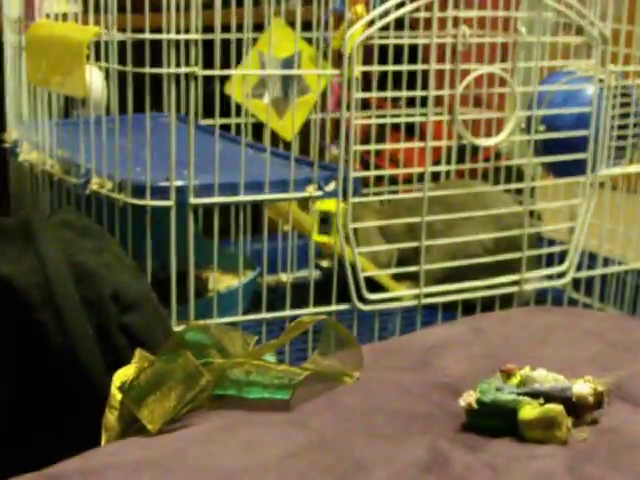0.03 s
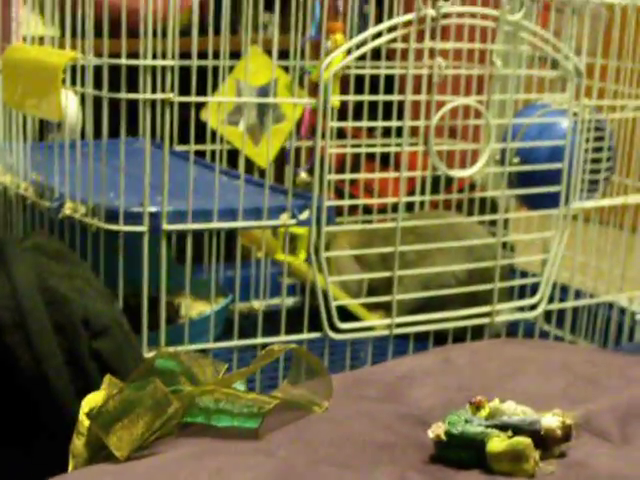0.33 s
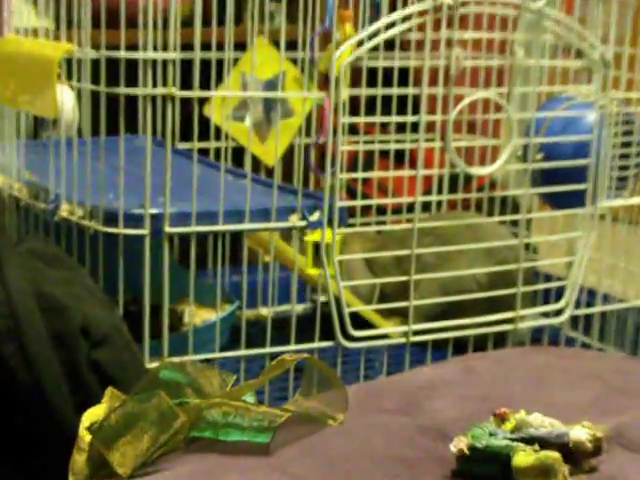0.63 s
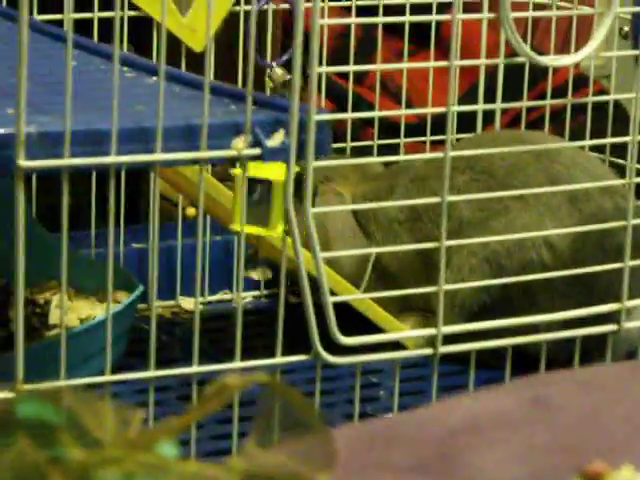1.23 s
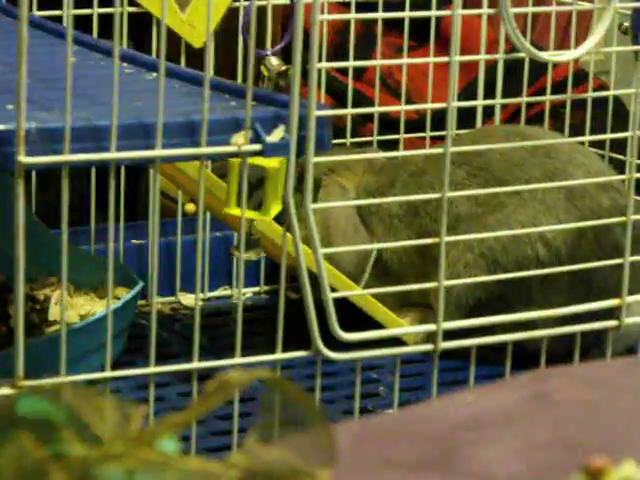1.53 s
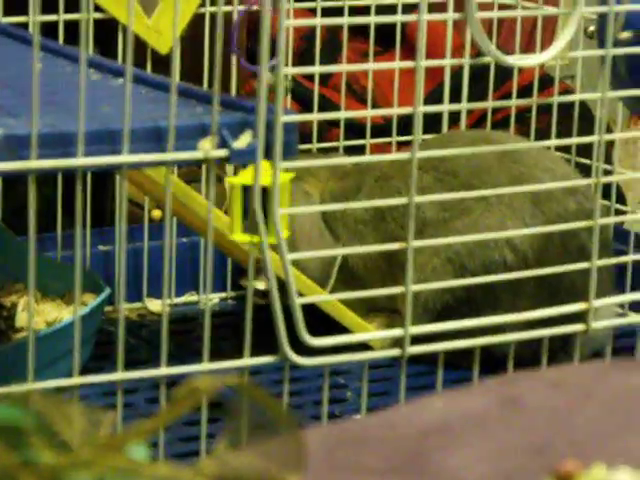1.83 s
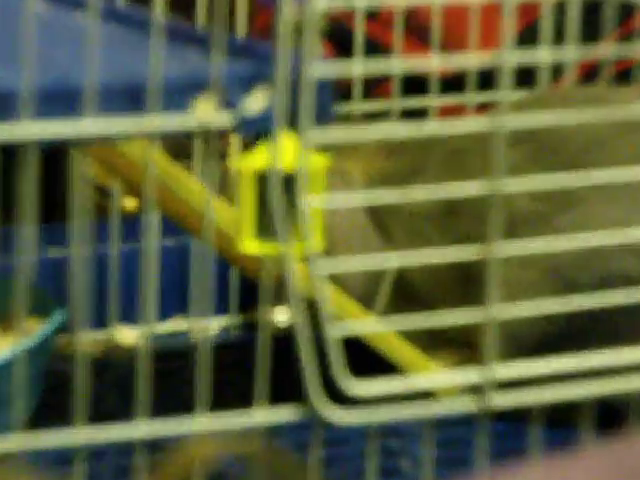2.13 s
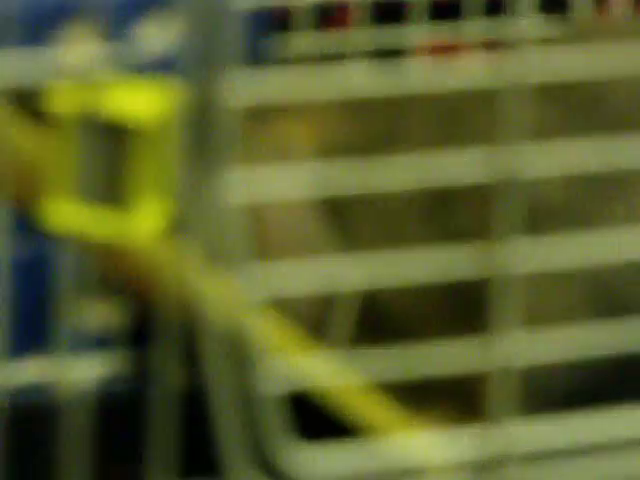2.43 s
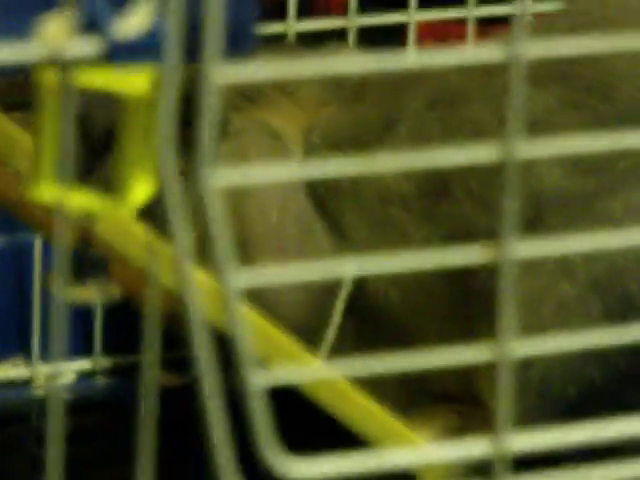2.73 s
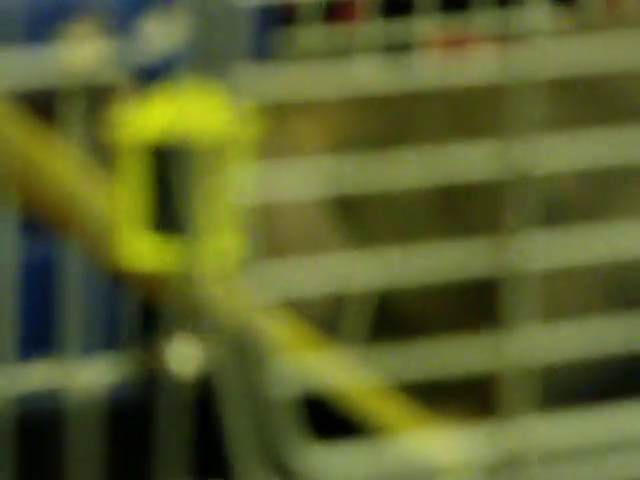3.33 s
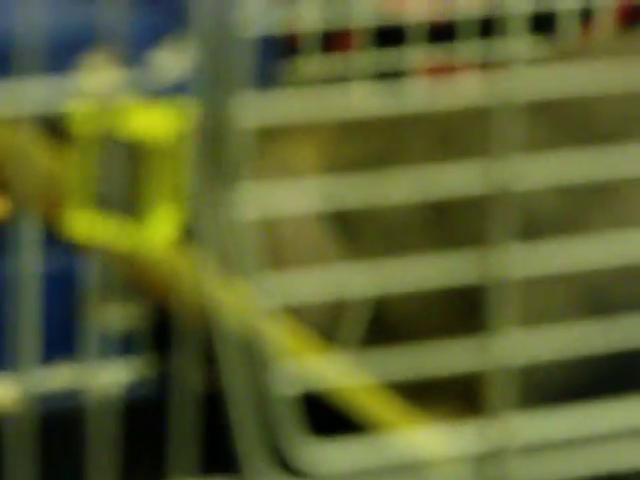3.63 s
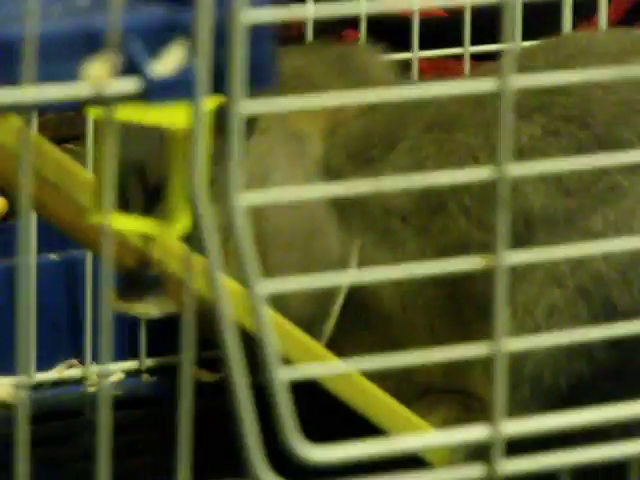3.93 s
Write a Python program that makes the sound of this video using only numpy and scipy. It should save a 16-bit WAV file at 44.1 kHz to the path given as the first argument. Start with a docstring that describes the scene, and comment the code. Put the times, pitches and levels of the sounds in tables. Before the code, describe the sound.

A small zoom motor whirs in three bursts inside a handheld camera, picked up by its own microphone indoors. Plastic clicks lead into each burst, and short buzzing focus rasps come between them and at the end, over constant hiss.

```python
"""A handheld camera zooms and refocuses in a quiet room, heard through its own body.
A steady hiss is there from the start, and the focus motor twitches. The zoom control clicks; the zoom
motor ticks step by step, spins up to a whine, then ticks to a halt. After more twitches comes a longer
zoom, near 2 s. The focus motor rasps in short runs, then the loudest click leads into a brief zoom.
A few more ticks and clicks follow, and one last rasp of the focus motor ends the scene."""
import sys
import numpy as np
from scipy import signal
from scipy.fft import rfft, irfft
from scipy.io import wavfile
from scipy.ndimage import uniform_filter1d

SR = 44100
rng = np.random.default_rng(int(sys.argv[2]) if len(sys.argv) > 2 else 0)


def persist_wave(psi):
    """Save psi, clipped to +-1, as 16-bit WAV."""
    counts = np.round(np.clip(psi, -1, 1) * 32767).astype(np.int16)
    wavfile.write(sys.argv[1], SR, np.atleast_2d(counts).T)


N = 176400
T = np.arange(N) / SR


def undb(db):
    """Turn decibels into a number to multiply a sound by."""
    return 10 ** (np.asarray(db) / 20)


def unit(x):
    """Scale a signal to an average power of 1."""
    return x / np.sqrt(np.mean(x ** 2))


def noise():
    """White noise: all frequencies equally strong."""
    return rng.standard_normal(N)


def wander(per_second):
    """A smooth random drift, about 1 in size."""
    hold = int(SR / per_second)
    stairs = np.repeat(rng.standard_normal(N // hold + 1), hold)
    return unit(uniform_filter1d(stairs, hold)[:N])


def gate(start, end, rise, fall):
    """Fade in from the start, hold, then die away after the end (all in seconds)."""
    return np.clip((T - start) / rise, 0, 1) * np.exp(-np.maximum(T - end, 0) / fall)


def gain_at(curve, hz):
    """Read the gain at a frequency off a curve of (frequency [Hz], level [dB]) points."""
    at, db = np.array(curve, float).T
    return undb(np.interp(np.log(hz), np.log(at), db))


def colour(x, curve, size=2048):
    """Give a sound the lows and highs of a curve; white noise keeps its power."""
    cepstrum = irfft(np.log(gain_at(curve, np.fft.rfftfreq(size, 1 / SR) + 1)))
    # make the filter ring after each tap, never before it
    cepstrum[1:size // 2] *= 2
    cepstrum[size // 2 + 1:] = 0
    ring = irfft(np.exp(rfft(cepstrum)))
    return signal.fftconvolve(x, ring / np.linalg.norm(ring))[:N]


def overtones(hz, table, flutter_db, flutter_rate, body=None):
    """Tones at multiples of a pitch; each flutters, and swells where the body (if given) rings."""
    phase, out = 2 * np.pi * np.cumsum(hz) / SR, 0
    for multiple, db in table:
        gain = undb(db + flutter_db * wander(flutter_rate))
        boost = gain_at(body, multiple * hz) if body else 1
        out = out + gain * boost * np.sin(multiple * phase + rng.uniform(0, 2 * np.pi))
    return unit(out)


# the lows and highs of the hiss (frequency [Hz], relative level [dB])
HISS_COLOUR = [(30, -7.5), (65, -5.5), (115, -10), (170, -9), (450, -6.5), (640, -9), (735, -5.5),
               (860, -9.5), (1900, -10.5), (3000, -14), (4800, -15), (5600, -21.5), (6100, -49.5)]


def hiss(level_db=-48.5):
    """The room and the microphone hiss, barely wavering."""
    return undb(level_db + 0.2 * wander(30)) * colour(noise(), HISS_COLOUR)


# each move of the focus motor (start [s], length [s], level [dB], knock boost [dB], treble boost [dB])
FOCUS_MOVES = [(0.033, 0.0079, -37.5, 5, 2), (0.0596, 0.0086, -39, 1, -4), (0.315, 0.0029, -34, -1.5, -6),
               (1.059, 0.011, -34, 1.5, -5), (1.0835, 0.0088, -38.5, 4, -6), (1.597, 0.021, -44.5, 0, -3.5),
               (1.645, 0.0053, -32.5, 4, -2.5), (1.678, 0.035, -44, 3, -2.5), (2.637, 0.036, -30.5, 2, -2),
               (2.673, .11, -29, -13, 0.5), (2.798, 0.012, -33, -9, 7), (2.887, 0.0032, -36, 11, 11),
               (2.893, 0.036, -49, -21, 13), (2.946, 0.042, -30, 3.5, 0), (2.974, 0.086, -28.5, 9, -1),
               (3.061, 0.044, -29, 1, -3.5), (3.852, 0.0036, -31, -13, 0.5),
               (3.864, 0.12, -30.5, -14, -1.5), (3.986, .02, -41.5, 8, -7)]
# the tones in its buzz (multiple of the step rate, relative level [dB])
FOCUS_BUZZ = [(1, -8.5), (2, -7), (3, -1), (4, -9), (7, 2.5), (8, -10), (10, -9)]
# its rasp (frequency [Hz], relative level [dB])
FOCUS_RASP = [(100, -44), (240, -37), (330, -12), (440, -3), (750, -3), (1000, 2), (1250, 2), (1500, -0.5),
              (1930, -2.5), (2130, 4.5), (2280, 0), (3150, -6), (3800, -11.5), (4300, -27), (4850, -10.5),
              (5600, -35.5)]
# the dull knock of the sliding part (frequency [Hz], relative level [dB])
SLIDE_KNOCK = [(150, -28.5), (330, -9.5), (500, 0), (720, -2), (1000, -11), (1700, -6), (2500, -14.5),
               (4000, -40.5)]


def focus_motor(step_hz=309, steps_per_turn=10, rise_s=0.0046, treble_hz=1780):
    """The slide knocks, then the motor buzzes and rasps, throbbing with each turn of its screw."""
    turn_s = steps_per_turn / step_hz
    bind_s = 0.013  # the screw sticks most this long into a move, then once a turn
    low_level, high_level, knocks = 0, 0, 0
    for start, length, db, knock_db, treble_db in FOCUS_MOVES:
        throb_db = 1.8 * np.cos(2 * np.pi * (T - start - bind_s) / turn_s)
        level = undb(db + throb_db) * gate(start, start + length, rise_s, fall=0.0038)
        low_level = np.maximum(low_level, level)
        high_level = np.maximum(high_level, level * undb(treble_db))
        knocks = knocks + undb(knock_db - 38.5) * gate(start, start + rise_s, rise_s, fall=0.006)
    hz = step_hz * (1 + 0.0015 * wander(110))
    step_pulses = np.exp(-(np.cumsum(hz) / SR % 1) / 0.77)
    screw_scrape = np.resize(noise()[:int(turn_s * SR)], N)  # the same on every turn
    rasp = colour(unit(step_pulses * (noise() + undb(-2) * screw_scrape)), FOCUS_RASP)
    buzz = overtones(hz, FOCUS_BUZZ, flutter_db=2, flutter_rate=53)
    running = undb(0.7 * wander(130)) * unit(rasp + undb(-6) * buzz)
    lows = signal.sosfiltfilt(signal.butter(4, treble_hz, fs=SR, output="sos"), running)
    return low_level * lows + high_level * (running - lows) + knocks * colour(noise(), SLIDE_KNOCK)


# each click of the zoom control or a lens part (time [s], level [dB], brightness [dB per octave],
# case pitch [ratio], ring length [ratio], relative thump level [dB])
CLICKS = [(0.3363, -23, 18, 0.86, 1.2, -23), (0.5462, -7, -0.5, 0.99, 0.93, -38),
          (0.5609, -29, -4, 0.5, 2.3, 5.5), (0.5673, -19.5, -3.5, 1.22, 0.56, -31),
          (1.0314, -20, 2, 0.86, 0.81, -37), (1.069, -22, -8, 1.1, 1, -28),
          (1.0896, -28, -2.5, 1.0, 1, -31), (1.8496, -6.5, 1, 0.988, 0.88, -32),
          (1.856, -25, 6, 0.88, 0.56, -7.5), (2.6434, -28, 2, 0.8, 0.78, -44),
          (2.8084, -22, -7, 1.3, 1.5, -32), (2.8954, -13.5, 6.5, 0.89, 0.73, -34),
          (2.9397, -14.5, 6, 1.14, 0.64, -40), (2.9819, -17, 2, 0.8, 0.83, -40),
          (3.0109, -16, 0.5, 0.91, 0.61, -42), (3.1593, -19, 9, 0.95, 0.73, -42),
          (3.1702, -0.3, 4, 0.87, 1.15, -19), (3.7155, -25, 15, 0.95, 1.04, -3),
          (3.758, -23.5, 8, 0.92, 0.88, -18), (3.7833, -6.5, -0.5, 0.97, 1.35, -38)]
# the notes of the plastic case, which shift with where it is hit
# (frequency [Hz], relative level [dB], time to fade by 60 dB [s])
CASE_NOTES = [(535, -16, 0.03), (812, -13, 0.02), (1352, 0.5, 0.02), (1647, 3.5, 0.016)]
# the notes of the small snapping latch (frequency [Hz], relative level [dB], time to fade by 60 dB [s])
LATCH_NOTES = [(2152, -3.5, 0.018), (2493, 4, 0.01), (3040, -8.5, 0.019), (4960, -4, 0.011)]


def clicks(contact_s=0.00028, rattle_s=0.005, thump_s=0.007, size=4096):
    """Each click briefly rings the case and the latch, with a faint rattle and a dull thump."""
    out, t = np.zeros(N + size), T[:size]
    contact = np.sin(np.pi / 2 * np.minimum(t / contact_s, 1)) ** 2
    # the small case gives off little sound outside 553-3475 Hz
    cut_lows = signal.butter(2, 553, "high", fs=SR, output="sos")
    cut_highs = signal.butter(4, 3475, fs=SR, output="sos")
    muffle = signal.butter(2, 300, fs=SR, output="sos")
    for time, db, bright, pitch, length, thump_db in CLICKS:
        case_notes = [(hz * pitch, note_db, fade_s) for hz, note_db, fade_s in CASE_NOTES]
        ring = 0
        for hz, note_db, fade_s in case_notes + LATCH_NOTES:
            gain = undb(note_db + bright * np.log2(hz / 1500))
            fade = np.exp(-np.log(1000) * t / (fade_s * length))
            ring = ring + gain * fade * np.sin(2 * np.pi * hz * t)
        ring = signal.sosfilt(cut_highs, signal.sosfilt(cut_lows, contact * ring))
        rattle = undb(-40) * np.exp(-t / rattle_s) * rng.standard_normal(size)
        low_noise = unit(signal.sosfilt(muffle, rng.standard_normal(size)))
        thump = undb(thump_db) * np.exp(-t / thump_s) * low_noise / 2
        i = int(time * SR)
        out[i:i + size] += undb(db) * (ring / np.abs(ring).max() + rattle + thump)
    return out[:N]


# each stretch of ticking by the zoom motor
# (start [s], end [s], first speed [steps/s], last speed [steps/s], level [dB], ring pitch [ratio])
TICK_RUNS = [(.545, 0.678, 195, 310, -37, 1.007), (0.948, 1.021, 390, 236, -38.5, 0.99),
             (1.858, 1.98, 213, 304, -38, 0.99), (2.435, 2.555, 320, 322, -34, 1.015),
             (2.563, 2.602, 224, 233, -36, 1.014), (3.225, 3.293, 211, 244, -40.5, 1.01),
             (3.346, 3.45, 317, 308, -39, 1.04), (3.449, 3.492, 264, 280, -41, 1.04),
             (3.708, 3.826, 165, 210, -41.5, 1.005)]
# how the lens barrel, the tube around the lens, rings (frequency [Hz], relative level [dB])
BARREL_RING = [(60, -12), (150, -10), (400, -14), (900, -17), (1550, -6), (2000, -12.5), (2600, -4),
               (2950, -3), (3180, 3.5), (3650, -14), (4200, -10.5), (4550, -19.5), (4920, -6.5),
               (5250, -17.5), (5500, -28.5), (6000, -36.5)]


def zoom_ticks(steps_per_turn=6, swing_db=2, scatter_db=1.2, rub_db=-7):
    """Motor steps tap the barrel, with light rubbing in between; the ring shifts as the lens travels."""
    out, rub = 0, noise()
    for start, end, first, last, db, pitch in TICK_RUNS:
        push = undb(db + rub_db) * gate(start, end, rise=0.0021, fall=0.0077) * rub
        time, step = start, 0
        while time < end:
            rate = np.interp(time, [start, end], [first, last])
            accent_db = swing_db * np.sin(2 * np.pi * step / steps_per_turn)  # up and down each turn
            accent_db += scatter_db * rng.standard_normal()
            push[int(time * SR)] += undb(db + accent_db) * np.sqrt(SR / rate)
            time += (1 + 0.05 * rng.standard_normal()) / rate  # slightly uneven timing
            step += 1
        out = out + colour(push, [(hz * pitch, ring_db) for hz, ring_db in BARREL_RING])
    return out


# the zoom motor at full speed, one list per run (time [s], pitch [Hz], level [dB])
WHINE_RUNS = [
    [(0.675, 275.0, -34), (0.697, 299.3, -30), (0.735, 324.6, -29), (0.762, 338, -28.5), (0.78, 329.3, -29),
     (0.83, 341.3, -29), (0.842, 332, -27.5), (0.854, 335.6, -29), (0.897, 341.6, -29.5),
     (0.932, 337.3, -27.5), (0.942, 323, -33)],
    [(1.981, 265.4, -30), (1.993, 274.7, -32.5), (2.017, 301.9, -29.5), (2.047, 324.3, -30),
     (2.08, 334, -29), (2.1, 326, -29.5), (2.168, 338, -29), (2.196, 337.5, -28), (2.206, 329.2, -30),
     (2.254, 340, -28), (2.28, 329, -28), (2.322, 341.5, -29), (2.346, 330.6, -28), (2.396, 338.3, -27.5),
     (2.41, 320.3, -26), (2.435, 333.7, -34)],
    [(3.291, 265.7, -32), (3.327, 299.8, -30.5), (3.343, 310.7, -34)],
]
# the whine's tones before the barrel shapes them (multiple of the shaft's spin rate, relative level [dB])
WHINE_TONES = [(4, 1), (12, 9), (15, -1.5), (18, 5), (21, 8.5), (27, 3.5), (30, -4), (33, 7), (39, 1),
               (45, 4), (54, 5.5)]
# the hiss of the gears (frequency [Hz], relative level [dB])
GEAR_HISS = [(200, -19.5), (450, -5.5), (900, -5), (1450, 1), (1900, -6.5), (2400, -2.5), (2750, -3),
             (3150, 2.5), (3500, -11.5), (4000, -7.5), (4550, -13.5), (4950, -8), (5400, -18.5),
             (6000, -35.5)]
# the rumble of the moving lens (frequency [Hz], relative level [dB])
LENS_RUMBLE = [(30, -36), (60, -13.5), (85, -2), (125, 1), (170, 0), (260, -5), (430, -6.5), (700, -47.5)]


def zoom_whine(whine_db=-1, gears_db=-5.5, rumble_db=-11, jolt_db=-23.5):
    """Each fast run starts with a jolt; then the motor whines, the gears hiss and the lens rumbles."""
    motor_level, lens_level, jolt_level = 0, 0, 0
    for run in WHINE_RUNS:
        times, _, db = np.array(run).T
        start, end = times[0], times[-1]
        level = undb(np.interp(T, times, db))
        motor_level = motor_level + level * gate(start, end, rise=0.017, fall=0.013)
        lens_level = lens_level + level * gate(start, end, rise=0.028, fall=0.075)
        jolt_level = jolt_level + gate(start, start + 0.0046, rise=0.00045, fall=0.0046)
    times, hz, _ = np.vstack(WHINE_RUNS).T
    shaft_hz = np.interp(T, times, hz) / 3  # the shaft spins at a third of the listed pitch
    shaft_hz *= 1 + 0.0018 * wander(160)
    whine = overtones(shaft_hz, WHINE_TONES, flutter_db=1.5, flutter_rate=70, body=BARREL_RING)
    gears = colour(noise() * undb(0.79 * wander(300)), GEAR_HISS)
    rumble = undb(rumble_db) * lens_level * colour(noise(), LENS_RUMBLE)
    jolts = undb(jolt_db) * colour(jolt_level * noise(), BARREL_RING)
    return motor_level * (undb(whine_db) * whine + undb(gears_db) * gears) + rumble + jolts


def scene():
    """Add the hiss, the motors and the clicks into one channel."""
    return (hiss() + zoom_whine() + zoom_ticks() + focus_motor() + clicks())[None]


def record(dry):
    """The recorder cuts the treble above 6100 Hz and just flattens the tip of the loudest click."""
    cut_treble = signal.ellip(10, .2, 90, 6100, fs=SR, output="sos")
    smooth_edges = signal.ellip(8, .2, 70, 15500, fs=SR, output="sos")
    clipped = np.clip(signal.sosfilt(cut_treble, dry), -0.72, 0.72)
    return signal.sosfilt(smooth_edges, clipped)


dry = scene()
out = record(dry)
persist_wave(out)
```